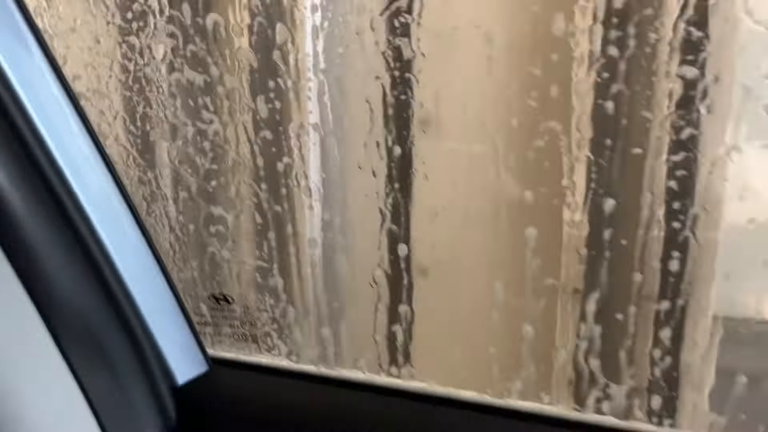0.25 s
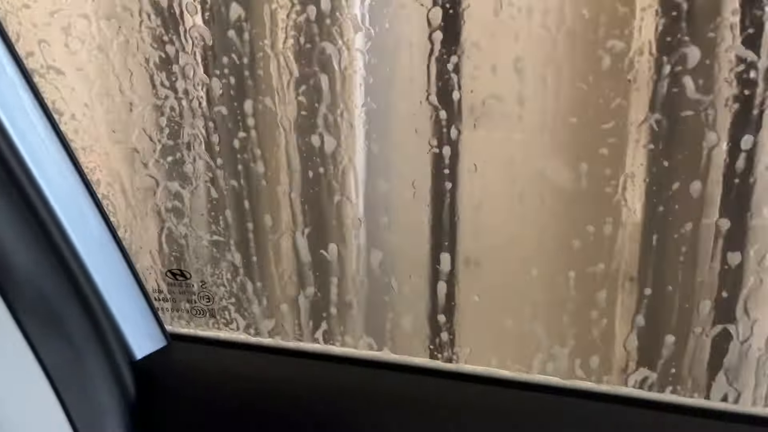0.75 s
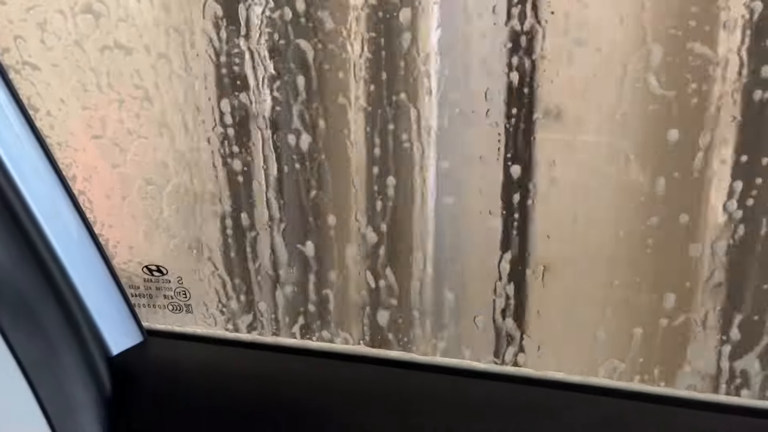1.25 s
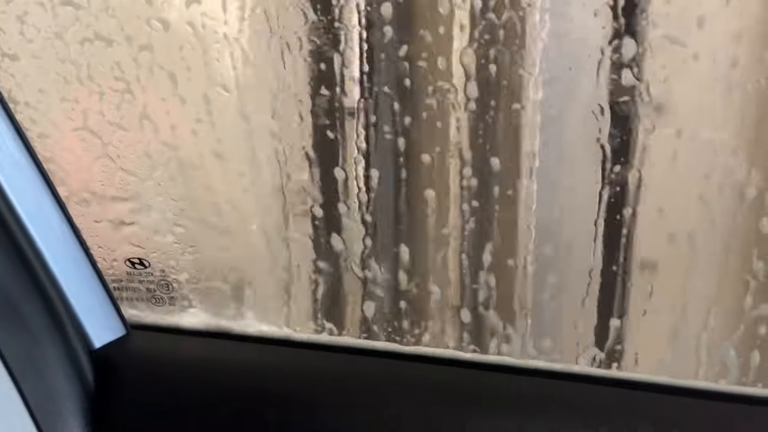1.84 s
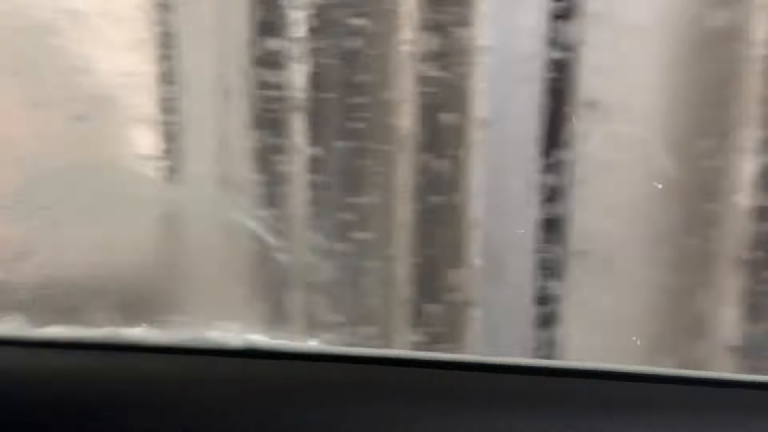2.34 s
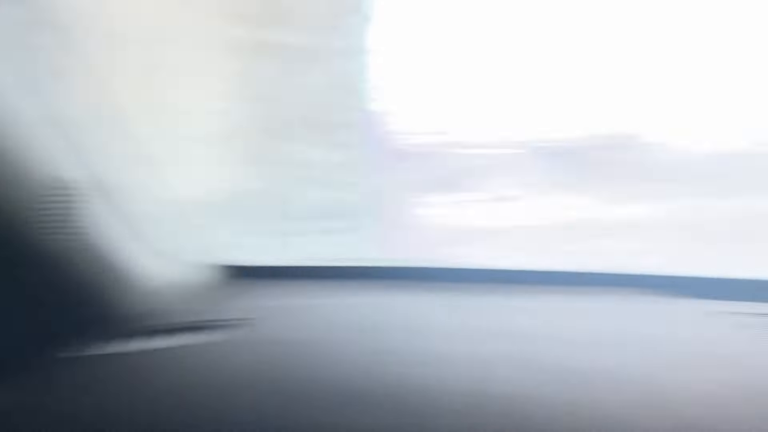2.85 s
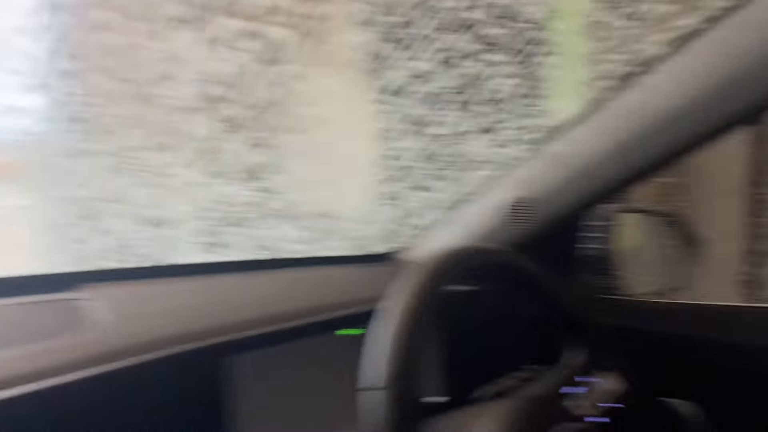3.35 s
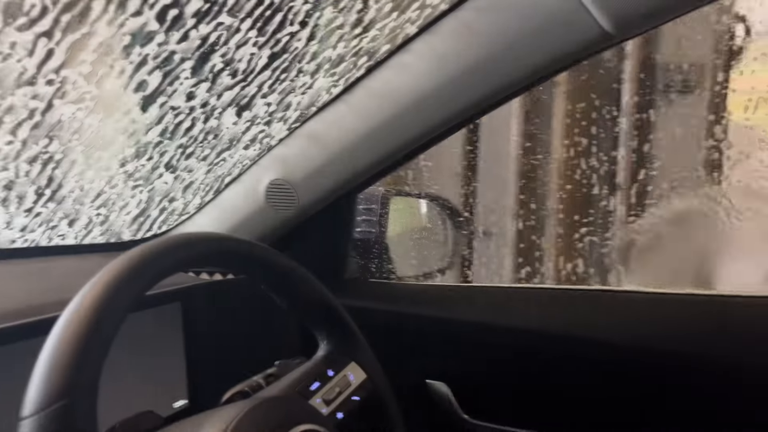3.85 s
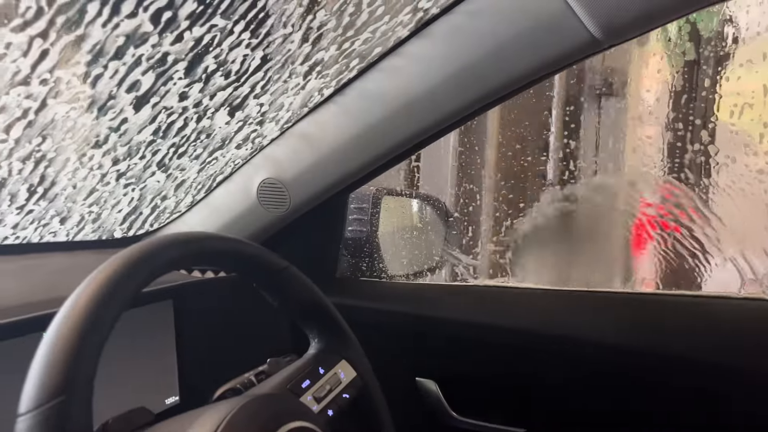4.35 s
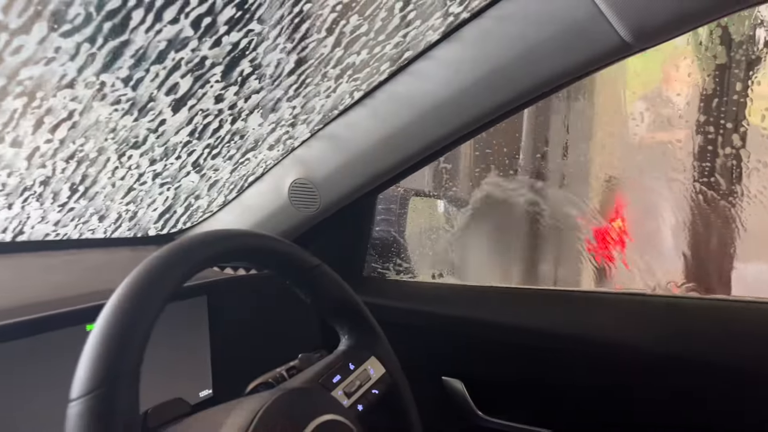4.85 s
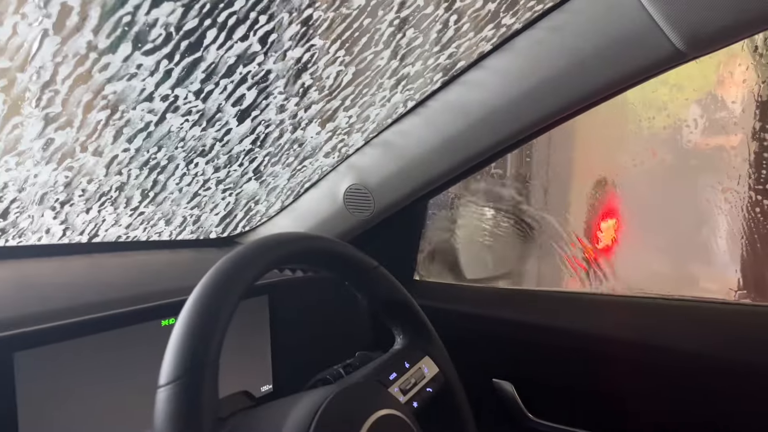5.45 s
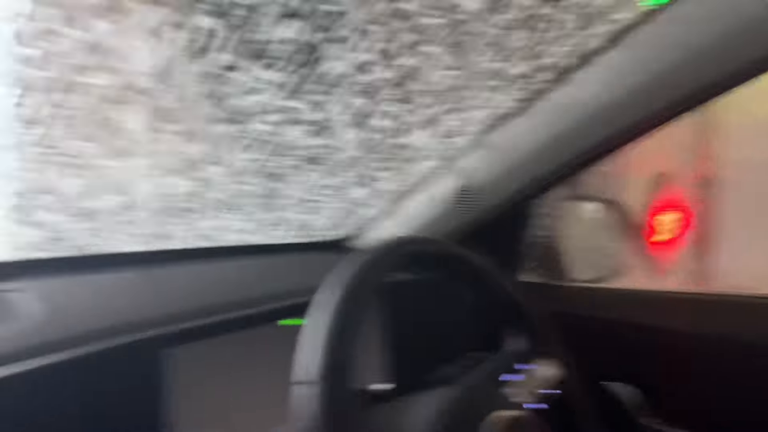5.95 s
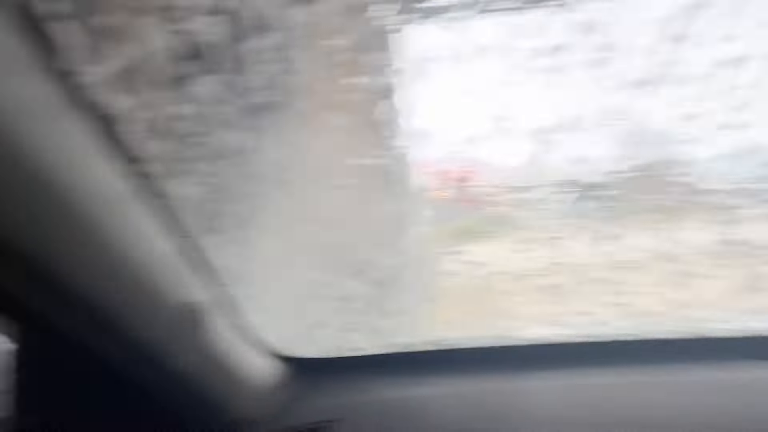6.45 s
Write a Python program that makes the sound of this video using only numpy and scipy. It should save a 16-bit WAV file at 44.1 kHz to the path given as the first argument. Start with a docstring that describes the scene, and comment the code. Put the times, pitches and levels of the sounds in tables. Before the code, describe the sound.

Spinning wash brushes drum and thump against a car body, heard from a seat inside, with steady water hiss, rustling cloth and light plastic knocks.

```python
"""Inside a rollover car wash

Heard from a seat in a closed car. Brush motors hum as wavering harmonics; spinning cloth strips drum, boom and slap,
made of filtered random blows and noise. Dense droplets hiss on the glass and ring the side window. Clothing swishes
and its weave sings as the listener turns from the side window to the front and beyond; brushes rub panels into low
gliding notes, and plastic is knocked lightly."""
import sys
import numpy as np
from scipy import signal
from scipy.io import wavfile
from scipy.ndimage import uniform_filter1d

SR = 44100
rng = np.random.default_rng(int(sys.argv[2]) if len(sys.argv) > 2 else 0)


def pcm_store(signal):
    """Save signal as 16-bit PCM."""
    levels = np.round(np.clip(np.atleast_2d(signal), -1, 1) * 32767)
    wavfile.write(sys.argv[1], SR, levels.astype(np.int16).T)


N = 294588

# Where the listener faces. Each row: time in seconds, heading in rad (0 = front, left negative).
HEADING = [(0, -1.4), (.3, -0.62), (2.7, -0.72), (2.96, -0.23), (3.32, 0.17), (3.44, 0.45), (5.9, 0.95),
           (6.35, -0.22), (6.68, -0.5)]
# The jet sweeps over the side window. Each row: peak time, rise and fall in seconds, level in dB.
JET_SWEEPS = [(1.68, 0.56, 0.58, -58.5), (2.25, 1.1, 0.49, -55), (3.13, 0.55, 0.46, -58.5),
              (4.1, 1.2, 0.59, -63), (5.2, 2.2, .8, -62), (6.5, 0.88, 0.8, -62)]
# Clothing slides as the listener moves. Each row: peak time, rise and fall in seconds, level in dB,
# ring of the fold in Hz, its width in Hz, its level against the swish in dB.
SWISHES = [(.07, 1, 0.43, -46.5, 1198, 696, -7.5), (1.95, 0.54, 1.7, -62, 1314, 220, 2.5),
           (2.56, 0.34, 0.8, -38.3, 1100, 700, -12.5), (3.17, 0.33, 0.28, -46, 1294, 200, -9),
           (6.46, 0.82, 0.55, -49, 1007, 900, -8.5)]


def from_db(db):
    """Amplitude gain of a level in dB."""
    return 10 ** (np.asarray(db) / 20)


def rms_one(x):
    """Scale to rms 1, over both ears together."""
    return x / np.sqrt(np.mean(x ** 2) + 1e-20)


def in_time(rows):
    """Each column of a curve, at every sample."""
    seconds, *columns = np.transpose(rows)
    return [np.interp(np.arange(N) / SR, seconds, column) for column in columns]


def at_hz(points, hz):
    """Read a table over log frequency."""
    table_hz, values = np.array(points).T
    return np.interp(np.log(hz), np.log(table_hz), values)


def pan(left_db):
    """Gains that make the left ear louder than the right by left_db."""
    return from_db(np.array([[left_db], [-left_db]]) / 2)


def drift(rate_hz):
    """Slow random curve of rms about 1: noise through two equal poles at rate_hz."""
    step = 40  # samples between the drawn points
    r = np.exp(-2 * np.pi * rate_hz * step / SR)
    noise = rng.standard_normal(N // step + 2002)
    slow = signal.lfilter([1], [1, -2 * r, r * r], noise)[2000:]  # skip the filter's start
    return np.interp(np.arange(N) / step, np.arange(len(slow)), rms_one(slow))


def resonate(x, hz, width_hz):
    """One resonance with a gain of about 1 at its top."""
    r = np.exp(-np.pi * width_hz / SR)
    zeros = np.array([1, 0, -1]) * (1 - r * r) / 2
    poles = [1, -2 * r * np.cos(2 * np.pi * hz / SR), r * r]
    return signal.lfilter(zeros, poles, x + 1e-18)


def low_pass(x, hz, order):
    """Roll off the treble above hz."""
    return signal.sosfilt(signal.butter(order, hz, fs=SR, output="sos"), x)


def impacts(per_s, spread_db):
    """Two trains of random tiny blows of uneven size; rms 1."""
    sizes = from_db(spread_db * np.minimum(rng.exponential(1, (2, N)), 5))
    signs = rng.choice([-1, 1], (2, N))
    falls = rng.random((2, N)) < per_s / SR
    return rms_one(sizes * signs * falls) + 1e-18


def two_ears(pair, hz):
    """Mix two independent signals so that long waves reach both ears alike and shorter ones differ."""
    # Each row: frequency in Hz, left-right correlation from -1 to 1.
    likeness = [(60, 1), (130, 0.89), (280, 0.74), (620, 0.37), (900, 0.15), (1400, -0.1), (2200, 0.18),
                (4200, 0.42), (7200, -0.15), (9100, -0.56), (11500, 0.72), (14500, -0.6)]
    # Each row: frequency in Hz, left minus right in dB.
    lean = [(60, 1), (250, 3.5), (600, 1), (950, 1), (1400, -2), (2000, 3), (3000, -0.5), (4500, 4),
            (7000, 0), (10000, -0.8)]
    alike = np.clip(at_hz(likeness, hz), -1, 1)
    common = np.sqrt((1 + alike) / 2) * pair[0]
    opposed = np.sqrt((1 - alike) / 2) * pair[1] * [[1], [-1]]
    return (common + opposed) * pan(at_hz(lean, hz))


def coloured(spectrum, per_s, spread_db, patchy_db, flutter_hz):
    """Dense impacts heard through third-octave bands whose levels flutter; rms 1."""
    shared_weight, own_weight = 0.35, 0.57  # flutter that all bands share, and each band's own
    edges_hz = 20 * 2 ** (np.arange(30) / 3)
    trains = [impacts(per_s, spread_db), impacts(per_s, spread_db)]
    shared, out = drift(flutter_hz), 0
    for k, (low, high) in enumerate(zip(edges_hz, edges_hz[1:])):
        hz = np.sqrt(low * high)
        if spectrum[0][0] <= hz <= spectrum[-1][0]:
            # neighbouring bands take different trains
            band = signal.sosfilt(signal.butter(2, [low, high], "band", fs=SR, output="sos"), trains[k % 2])
            flutter = shared_weight * shared + own_weight * drift(flutter_hz)
            out = out + two_ears(band, hz) * from_db(at_hz(spectrum, hz) + patchy_db * flutter)
    return rms_one(out)


def tone(hz):
    """A sine of rms 1 that follows a pitch curve."""
    return np.sqrt(2) * np.sin(2 * np.pi * (np.cumsum(hz) / SR + rng.random()))


def swell(peak_s, rise_s, fall_s, db):
    """Gain of one stroke: it builds to a rounded peak and dies away."""
    depth_db = 23.5  # drop one rise or fall time from the peak
    roundness = 1.59  # 1 = pointed, 2 = bell
    t = np.arange(N) / SR - peak_s
    away = np.maximum(-t / rise_s, t / fall_s).clip(0, 4)
    return from_db(db - depth_db * away ** roundness)


def swells(strokes):
    """Gain of several strokes that add in power."""
    return np.sqrt(sum(swell(*stroke) ** 2 for stroke in strokes))


def pressure(part):
    """Gain with which the pushes reach one part of the car: 0 body, 1 near door, 2 side window."""
    # A brush leans harder on the car. Each row: peak time, rise and fall in seconds,
    # levels on the body, near door and side window in dB.
    pushes = [(.02, .3, 1, -33, -45, -70), (.66, 0.59, 1, -59, -38, -44), (1.5, 1, 0.87, -38, -31.5, -43),
              (2.05, 0.52, 1, -34.5, -41.5, -52.5), (2.65, 0.64, 0.49, -31.5, -47, -56),
              (3.319, 0.73, 0.35, -42, -53, -55), (6.3, 0.81, 1, -48, -41.5, -77)]
    return swells([(peak_s, rise_s, fall_s, parts_db[part]) for peak_s, rise_s, fall_s, *parts_db in pushes])


def struck(events, width_hz, softness):
    """Soft blows on damped parts, each with its peak level and pitch; treble rolls off above softness x pitch."""
    out, click = np.zeros(N + SR), signal.unit_impulse(SR // 8)
    for start_s, db, hz in events:
        thud = low_pass(resonate(click, hz, width_hz), softness * hz, order=6)
        start = round(start_s * SR)
        out[start:start + len(thud)] += from_db(db) * thud / np.abs(thud).max()
    return out[:N]


def motors():
    """A wavering harmonic hum; motor load and a cabin node when facing front shift each order's level."""
    # Motor orders. Each row: multiple of the motor pitch, dB at mean load, dB gained per dB of load,
    # dB lost in the cabin's node when facing front, waver in dB.
    orders = [(1, -39, 0.98, 5.5, 1.33), (2, -33.5, 0.0, 7.5, 0.26), (3, -50.5, 1.0, 5, -0.5),
              (4, -47, -0.38, 12.5, 2.5), (5, -59.5, 0.5, -10.5, 3), (7, -67.5, -0.5, -4, 2),
              (9, -69, 0.5, 0, 2)]
    # Load on the brush motors, heavy until the side brush lets go. Each row: time in seconds, load in dB.
    load = [(.15, -29.5), (.65, -33.5), (1.55, -28), (2.65, -30), (3.25, -42), (5.3, -43.5), (5.9, -51),
            (6.5, -45.5)]
    motor_hz, wander = 72.46, 0.00049  # wander is a share of the pitch
    node_width_rad = 0.46  # how far the listener must turn to leave the node
    hz = motor_hz * (1 + wander * drift(1.67))
    (load_db,), (heading,) = in_time(load), in_time(HEADING)
    strain_db = load_db - load_db.mean()
    in_node = np.exp(-(heading / node_width_rad) ** 2)
    hum = 0
    for multiple, db, follows, node_db, waver_db in orders:
        level_db = db + follows * strain_db - node_db * in_node + waver_db * drift(3.9)
        hum = hum + tone(round(multiple) * hz) * from_db(level_db)
    return pan(0.12) * hum


def brushes():
    """Wet strips beat the body to a dull rumble; those on the near door ring its modes."""
    # What the body lets through. Each row: frequency in Hz, relative level per Hz in dB.
    drumming = [(22, -54), (36, -46), (50, 2), (70, -5.5), (100, 3), (130, 1), (175, -9.5), (250, -7.5),
                (330, -12), (420, -30), (560, -22), (750, -33)]
    # Door and window modes. Each row: frequency in Hz, width in Hz, relative level in dB.
    modes = [(178.7, 11.5, 5), (212, 24, 4), (234, 37, 4), (305, 78, 2.5), (348.3, 24, -1.5),
             (414, 22, -3.5)]
    body_db, door_db = -37, -52  # steady beating, to which the pushes add in power
    body = coloured(drumming, per_s=1500, spread_db=-0.5, patchy_db=3.0, flutter_hz=9.5)
    door = 0
    for hz, width_hz, db in modes:
        ring = rms_one(resonate(impacts(per_s=400, spread_db=1.0), hz, width_hz))
        door = door + from_db(db) * two_ears(ring, hz)
    door = rms_one(low_pass(door, 470, order=12))
    rumble = np.hypot(from_db(body_db), pressure(0)) * body
    return rumble + pan(0.49) * np.hypot(from_db(door_db), pressure(1)) * door


def scrub():
    """Dense rubbing on the side window, heard through the pane's low mode: a hollow roar."""
    hz, width_hz = 432, 48
    roar = impacts(per_s=830, spread_db=-1.0)
    for _ in range(2):
        roar = resonate(roar, hz, width_hz)
    return pan(1.0) * pressure(2) * two_ears(rms_one(roar), hz)


def spray():
    """Thousands of droplets a second merge to a hiss behind the glass; the jet adds a fine sizzle as it passes."""
    # Amount of water on the glass. Each row: time in seconds, level in dB.
    amount = [(0, -53.5), (1.25, -52.5), (2.4, -49.5), (3.6, -54), (4.2, -54.5), (5.45, -52), (5.85, -57),
              (6.15, -54), (6.68, -53)]
    # Water through the glass. Each row: frequency in Hz, relative level per Hz in dB.
    water = [(450, 10), (560, 2), (700, 4), (900, 2.5), (1100, 2.5), (1450, 0.5), (1900, -3.5),
             (2400, -4.5), (3100, -2), (4100, -1.5), (5000, -2), (7000, -7), (11000, -13), (16000, -13)]
    # The jet's own fine sizzle. Each row: frequency in Hz, relative level per Hz in dB.
    fine = [(5000, -20), (7000, -1), (11000, 0), (16000, -3)]
    sizzle_db = -1.5  # against the sweeps' ringing of the pane
    spray_db, = in_time(amount)
    hiss = from_db(spray_db) * coloured(water, per_s=8000, spread_db=1.5, patchy_db=1.4, flutter_hz=16)
    sizzle = coloured(fine, per_s=9000, spread_db=-1.0, patchy_db=0.0, flutter_hz=20)
    return hiss + from_db(sizzle_db) * swells(JET_SWEEPS) * sizzle


def side_window():
    """Drops ring the near pane; its bending waves reach the two ears partly in opposite phase."""
    # The side window's rings. Each row: frequency in Hz, width in Hz, relative level in dB.
    pane = [(1400, 200, 3), (1694, 150, -0.5), (2800, 200, 0), (3860, 200, 5.5), (4500, 400, 6.5)]
    stray_db = -64  # stray drops, to which the jet sweeps add in power
    out = 0
    for hz, width_hz, db in pane:
        common, opposed = rms_one(resonate(impacts(per_s=2500, spread_db=2.0), hz, width_hz))
        out = out + from_db(db) * (common + opposed * [[1], [-1]])
    return np.hypot(from_db(stray_db), swells(JET_SWEEPS)) * rms_one(out)


def cloth_swish():
    """Fibres catch and slip as clothing slides: dense tiny impacts in a broad, fluttering rush."""
    # The swish of cloth. Each row: frequency in Hz, relative level per Hz in dB.
    cloth = [(350, 3), (550, -2), (780, -3), (1000, 1), (1350, 0), (1650, -1.5), (2100, -8.5), (3000, -4.5),
             (4500, -4), (7000, -8.5), (11000, -12.5), (16000, -14)]
    rush = coloured(cloth, per_s=7000, spread_db=2.0, patchy_db=2.05, flutter_hz=15)
    return swells([row[:4] for row in SWISHES]) * rush


def folds():
    """Each swish also rings a fold of the cloth, a hollow colour that shifts as the fold bends."""
    wander = 0.04  # share by which the ring's pitch moves
    out = 0
    for *stroke, hz, width_hz, fold_db in SWISHES:
        centre_hz = hz * (1 + wander * drift(5))
        # slow noise times a tone makes a band around the tone
        ring = low_pass(impacts(per_s=1500, spread_db=1.5), width_hz / 2, order=2) * tone(centre_hz)
        out = out + from_db(fold_db) * swell(*stroke) * two_ears(rms_one(ring), hz)
    return out


def creases():
    """Creases snap at random within each swish, each with a brief ring: its coarse grain."""
    count, low_hz, high_hz = 18, 846, 5530  # pitches and their range
    snaps_per_s, cycles = 420, 40  # snaps over all pitches; pitch divided by ring width
    tilt_db, crease_db = -2.5, -8  # change per octave; level against the swish
    out = 0
    for hz in np.geomspace(low_hz, high_hz, count):
        ring = rms_one(resonate(impacts(snaps_per_s / count, spread_db=1.5), hz, hz / cycles))
        out = out + from_db(tilt_db * np.log2(hz / low_hz)) * two_ears(ring, hz)
    grain = rms_one(low_pass(out, high_hz, order=4))
    return from_db(crease_db) * swells([row[:4] for row in SWISHES]) * grain


def slaps():
    """Single heavy strips land on the door skin."""
    # The hardest slaps. Each row: start in seconds, peak in dB before panning, pitch in Hz.
    hits = [(1.094, -31, 200), (1.175, -25, 207), (1.241, -34, 152), (1.254, -32, 154), (1.332, -23, 290),
            (1.358, -23.5, 277), (1.375, -27, 255), (1.461, -15.5, 138), (1.535, -22, 178),
            (1.555, -21, 200), (1.572, -21, 202), (1.597, -23, 148), (1.627, -32, 211), (1.655, -25, 230),
            (1.763, -26, 200), (1.817, -23, 142), (1.846, -26, 202)]
    return pan(1.0) * struck(hits, width_hz=60, softness=1.67)


def buffets():
    """Each bunch of strips pushes on a large panel, which booms briefly around its own low pitch."""
    # Each row: peak time in seconds, rise and fall time in seconds, level in dB before panning, pitch in Hz.
    bunches = [(1.6, 0.48, -32.5, 70), (3.18, 0.37, -37.5, 58), (3.42, 0.081, -41, 50),
               (3.55, 0.12, -34.5, 90.5), (3.78, 0.42, -37.5, 90), (4.16, 0.5, -41.5, 72.4),
               (4.42, 0.29, -36.5, 83.5), (4.64, 0.1, -31.5, 77), (4.91, 0.066, -39, 91),
               (5.06, 0.17, -36, 78), (5.29, 0.052, -33, 75.5), (5.52, 0.19, -35, 83),
               (6.36, 0.12, -33.5, 82.4)]
    width_hz, even_s = 46, 0.043  # resonance width; window over which the boom is levelled
    out = 0
    for peak_s, reach_s, db, hz in bunches:
        boom = rng.standard_normal(N)
        for _ in range(2):
            boom = resonate(boom, hz, width_hz)
        level = np.sqrt(uniform_filter1d(boom ** 2, int(even_s * SR)) + 1e-12)
        out = out + swell(peak_s, reach_s, reach_s, db) * boom / level
    return pan(0.2) * out


def washes():
    """Wet strips drag water over the body: a soft, throaty rush."""
    # Each row: peak time, rise and fall in seconds, level in dB.
    drags = [(2.33, .6, 0.41, -45), (5.6, 0.76, 0.73, -52), (6.33, 0.51, 0.49, -48.5), (6.65, 0.5, .3, -48)]
    # Colour of the rush. Each row: frequency in Hz, relative level per Hz in dB.
    throat = [(280, 7), (360, 1), (480, 2), (600, -0.5), (780, -9.5), (1100, 0.5)]
    return swells(drags) * coloured(throat, per_s=2500, spread_db=3.0, patchy_db=0.5, flutter_hz=14)


def panel_drone():
    """Stick and slip set a panel swinging; each rub is a short, slightly rising sine with a wobbling pitch."""
    # A brush rubs a panel. Each row: peak time, rise and fall in seconds, level in dB before panning,
    # pitch at the peak in Hz.
    rubs = [(2.34, 0.071, 0.067, -26, 156), (2.5, .06, 0.45, -30.5, 149.3), (6.24, .06, 0.066, -33, 195),
            (6.32, .04, 0.034, -29.5, 170), (6.501, 0.05, 0.017, -24.5, 182),
            (6.614, 0.033, 0.04, -23, 171), (6.665, 0.077, 0.11, -25, 180)]
    glide_hz_per_s = 33  # the note climbs as the strip tightens
    wobble = 0.015  # share of the pitch
    t, out = np.arange(N) / SR, 0
    for peak_s, rise_s, fall_s, db, hz in rubs:
        pitch_hz = hz + glide_hz_per_s * np.clip(t - peak_s, -rise_s, fall_s)
        out = out + swell(peak_s, rise_s, fall_s, db) * tone(pitch_hz * (1 + wobble * drift(20.7)))
    return pan(2.7) * out


def weave_note():
    """In the fastest stroke the ribs of the sleeve's weave grip and sing a rising, rasping note."""
    # Each row: peak time, rise and fall in seconds, level in dB.
    grips = [(2.44, 0.05, 0.037, -43), (2.485, 0.028, 0.049, -40.5), (2.535, 0.028, 0.03, -43),
             (2.574, 0.033, 0.024, -37)]
    # The ribs pass faster as the sleeve speeds up. Each row: time in seconds, ribs per second in Hz.
    rib_rate = [(2.42, 580), (2.45, 603), (2.48, 656.6), (2.51, 735), (2.56, 769), (2.58, 790), (2.6, 860)]
    # Partials of the note. Each row: multiple of the rib rate, relative level in dB.
    partials = [(1, 1), (1.5, -8)]
    jitter, broken_db = 0.017, 2.2  # pitch share and level by which each partial wavers
    rasp_width_hz, rasp_db = 280, -8  # uneven ribs smear the note into a rasp
    rib_hz, = in_time(rib_rate)
    note = 0
    for multiple, db in partials:
        pitch_hz = multiple * rib_hz * (1 + jitter * drift(111))
        note = note + tone(pitch_hz) * from_db(db + broken_db * drift(69))
    smear = rms_one(low_pass(rng.standard_normal((2, N)), rasp_width_hz / 2, order=2))
    rasp = from_db(rasp_db) * smear * tone(rib_hz)
    return swells(grips) * rms_one(note + rasp)


def knocks():
    """Light touches on well damped plastic."""
    # Each row: start in seconds, peak in dB, pitch in Hz.
    touches = [(2.513, -26, 860), (2.722, -32, 540), (2.852, -32, 620), (3.078, -39, 1290),
               (3.176, -39, 1200), (3.4598, -37, 890)]
    return struck(touches, width_hz=380, softness=1.14)


def cabin(x):
    """Early reflections ripple the spectrum; their paths shift as the listener turns, differently for each ear."""
    # Glass and roof throw the sound back. Each row: mean delay in seconds, bearing in rad, level in dB.
    reflections = [(.0013, 0.5, -16), (.0024, 0.7, -31.5), (.0041, 2.2, -13), (.0067, 5.5, -11.5)]
    sway_s = 0.00043  # most that turning adds to or takes from a delay
    heading, = in_time(HEADING)
    n, out = np.arange(N), x.copy()
    for delay_s, bearing, db in reflections:
        for ear, side in enumerate((1, -1)):
            lag_s = delay_s + sway_s * np.cos(heading - bearing + side / 2)
            out[ear] += from_db(db) * np.interp(n - lag_s * SR, n, x[ear])
    return out


def scene():
    """The machine on the body, water and cloth with cabin reflections, the near pane and the knocks."""
    machine = motors() + brushes() + scrub() + slaps() + buffets() + washes() + panel_drone()
    water_and_cloth = spray() + cloth_swish() + folds() + creases() + weave_note()
    return machine + cabin(water_and_cloth) + side_window() + knocks()


def record(dry):
    """One treble band is heard only as a left-right difference, a higher one only alike in both ears; the top is cut."""
    difference_only_hz, alike_only_hz, cutoff_hz = (7600, 9050), (10900, 13200), 14400

    def without(band_hz, x):
        """Take a band out."""
        return signal.sosfilt(signal.butter(2, band_hz, "bandstop", fs=SR, output="sos"), x)

    mid = without(difference_only_hz, (dry[0] + dry[1]) / 2)
    side = without(alike_only_hz, (dry[0] - dry[1]) / 2)
    top_cut = signal.ellip(12, .1, 80, cutoff_hz, fs=SR, output="sos")
    return signal.sosfilt(top_cut, [mid + side, mid - side])


dry = scene()
out = record(dry)
pcm_store(out)
```